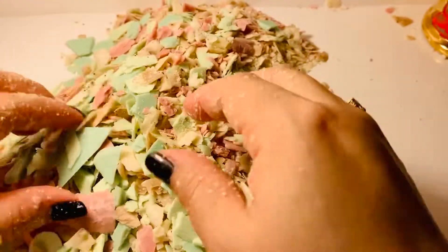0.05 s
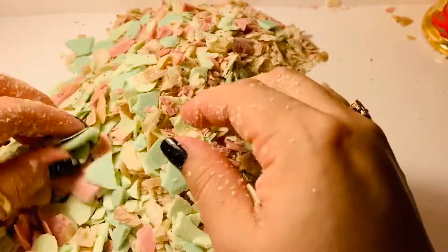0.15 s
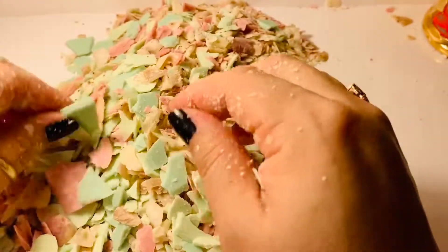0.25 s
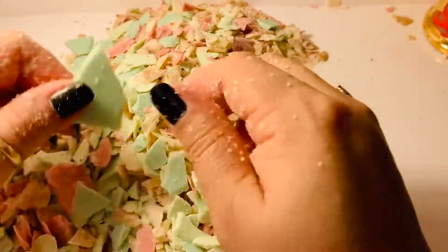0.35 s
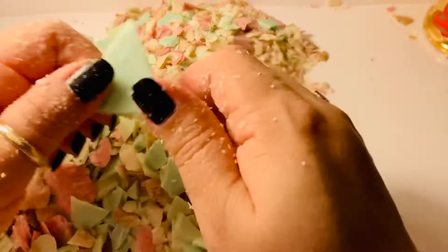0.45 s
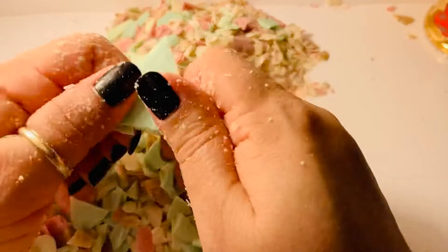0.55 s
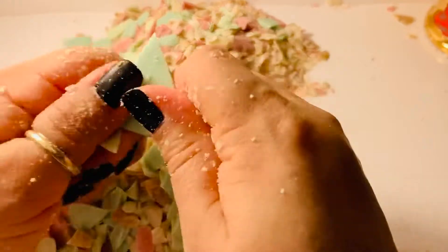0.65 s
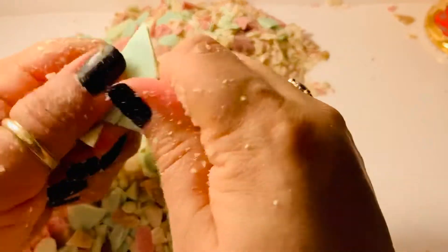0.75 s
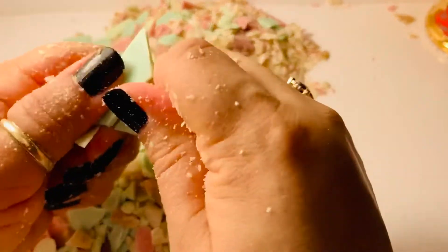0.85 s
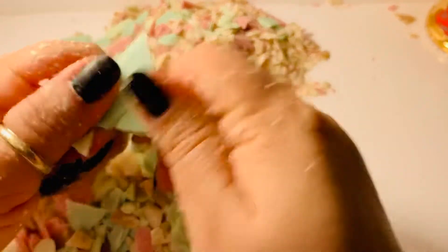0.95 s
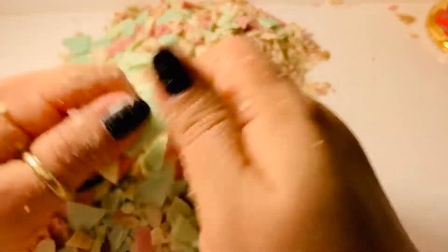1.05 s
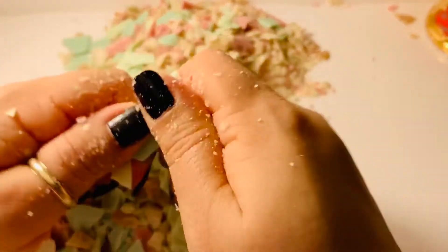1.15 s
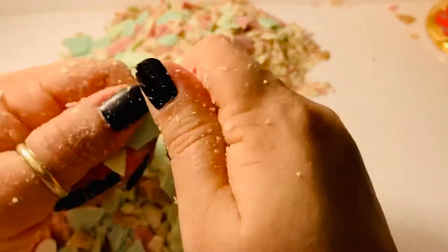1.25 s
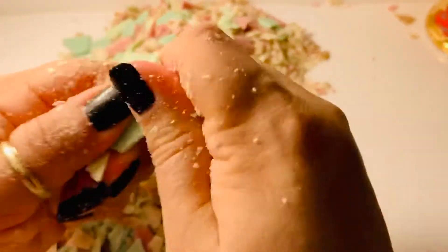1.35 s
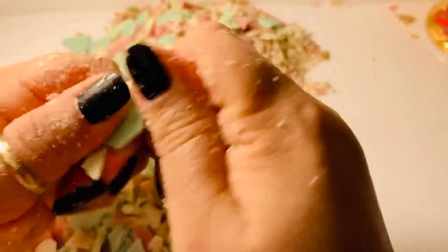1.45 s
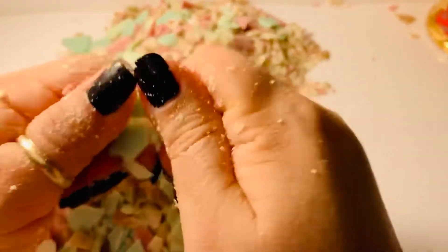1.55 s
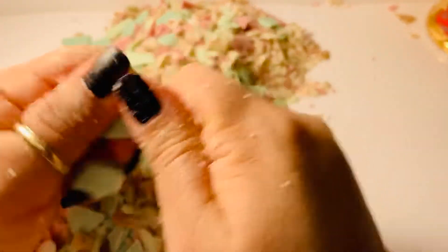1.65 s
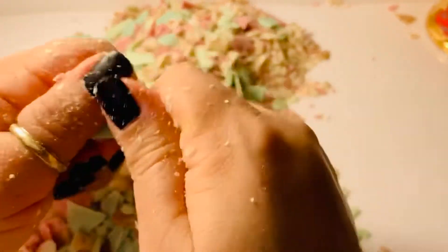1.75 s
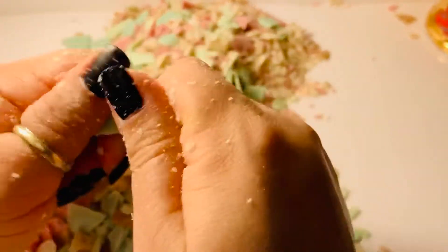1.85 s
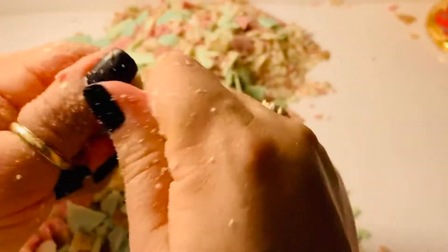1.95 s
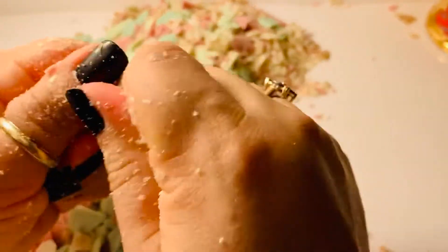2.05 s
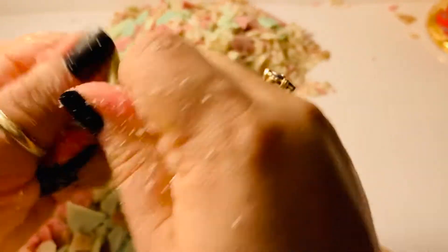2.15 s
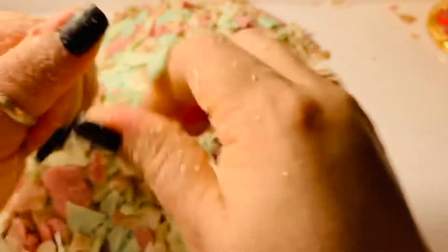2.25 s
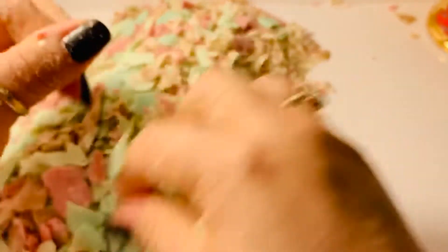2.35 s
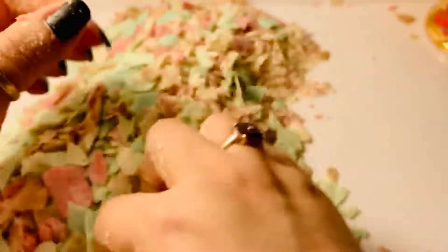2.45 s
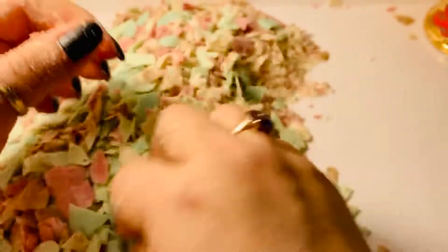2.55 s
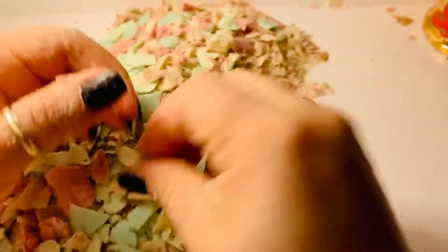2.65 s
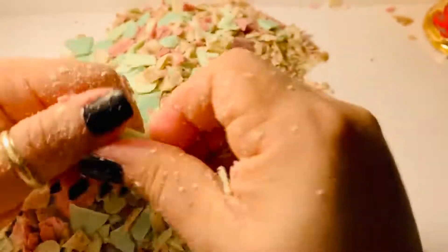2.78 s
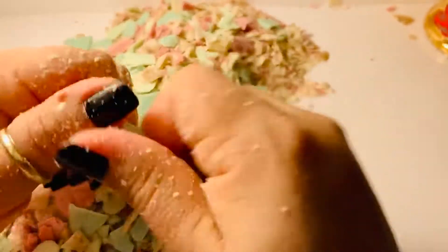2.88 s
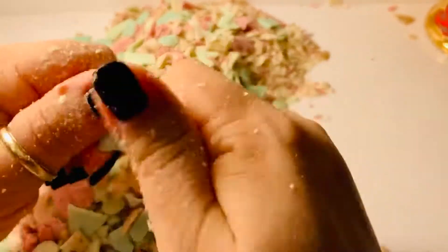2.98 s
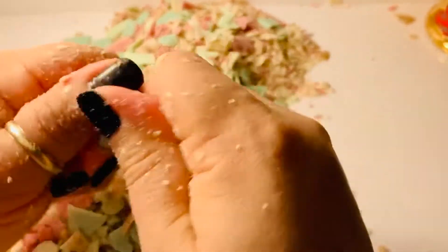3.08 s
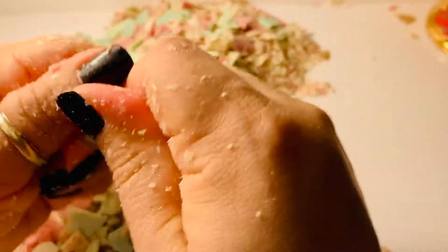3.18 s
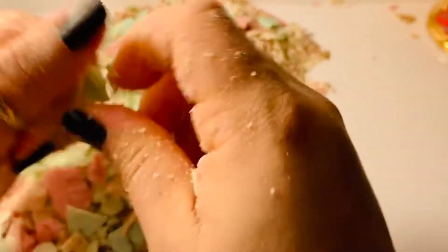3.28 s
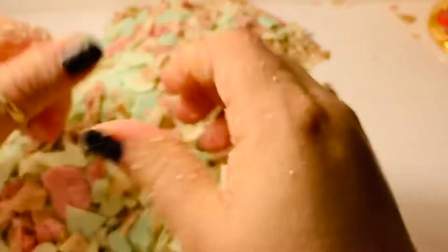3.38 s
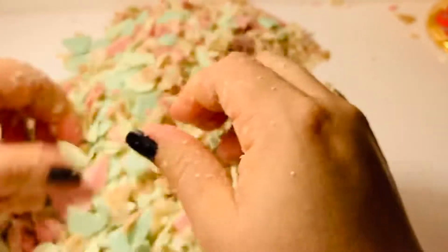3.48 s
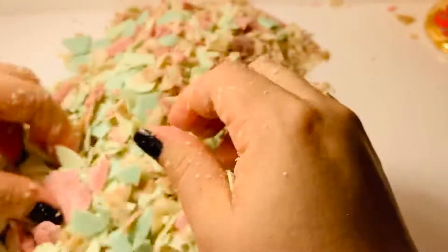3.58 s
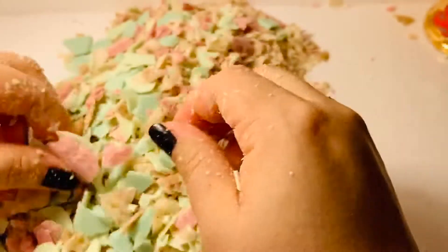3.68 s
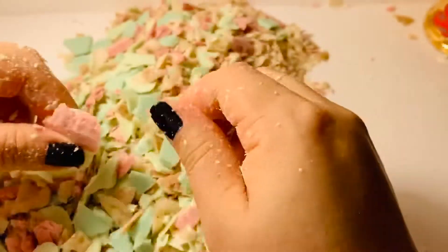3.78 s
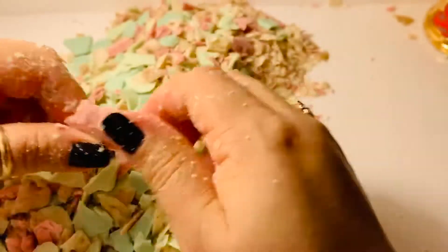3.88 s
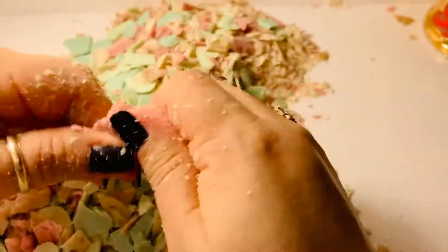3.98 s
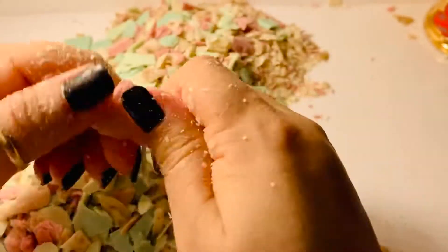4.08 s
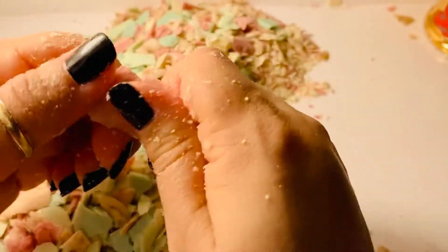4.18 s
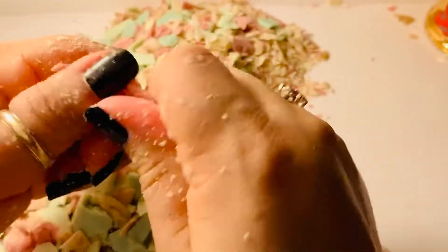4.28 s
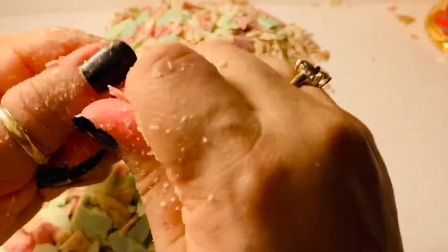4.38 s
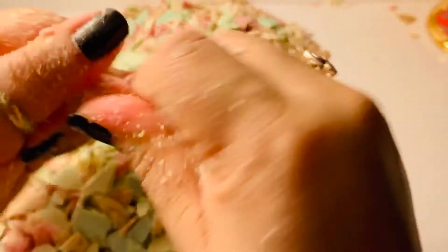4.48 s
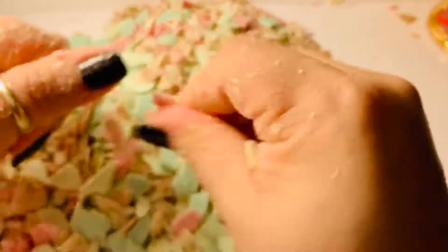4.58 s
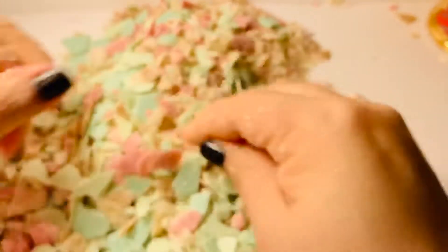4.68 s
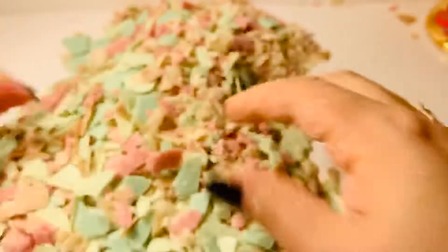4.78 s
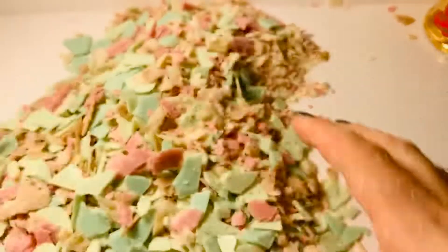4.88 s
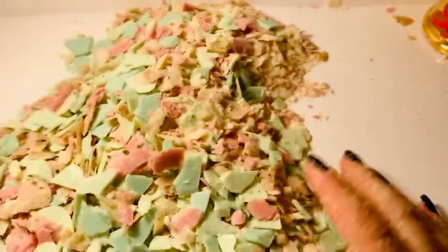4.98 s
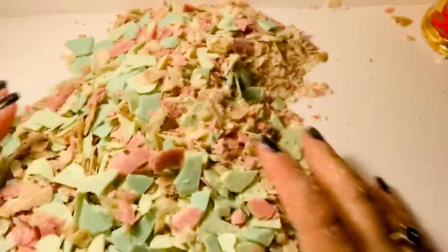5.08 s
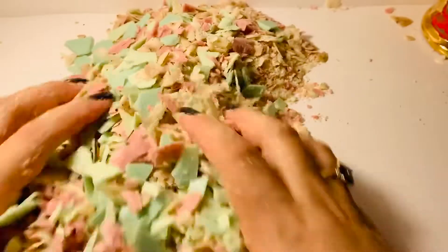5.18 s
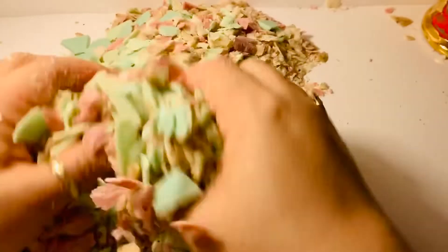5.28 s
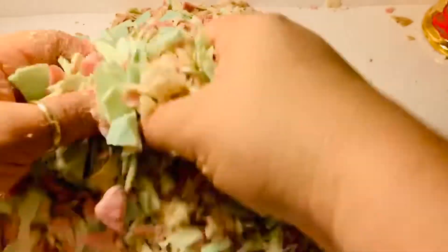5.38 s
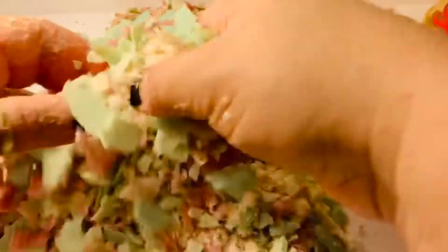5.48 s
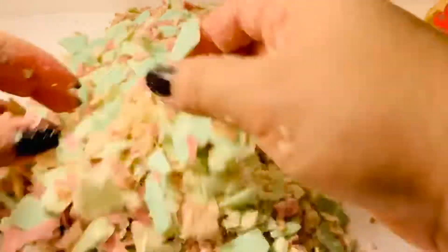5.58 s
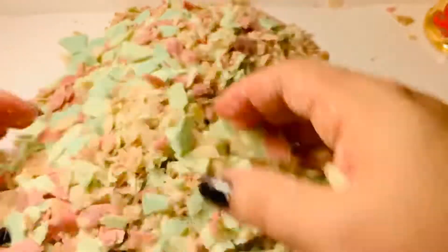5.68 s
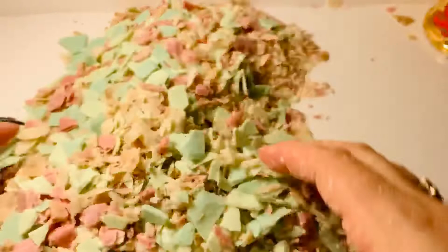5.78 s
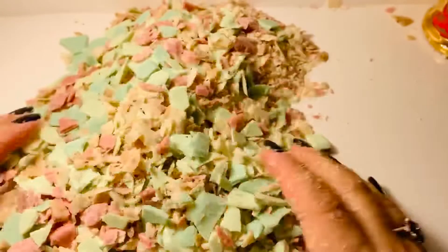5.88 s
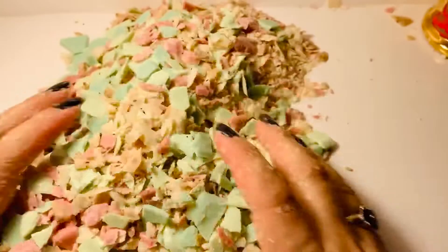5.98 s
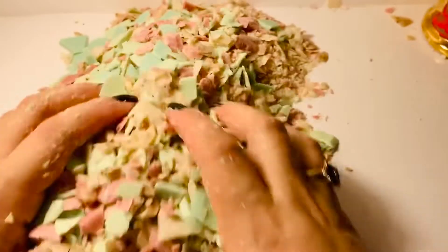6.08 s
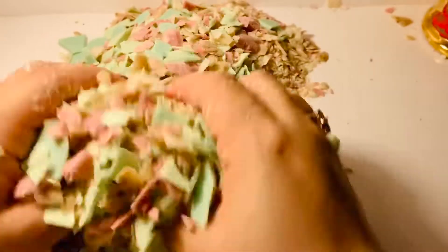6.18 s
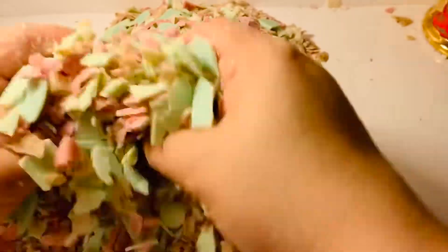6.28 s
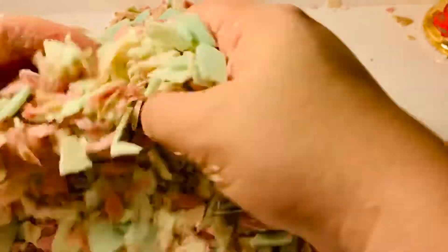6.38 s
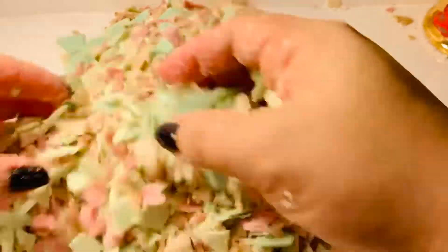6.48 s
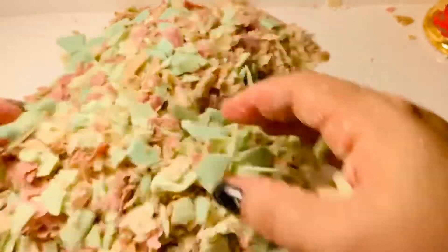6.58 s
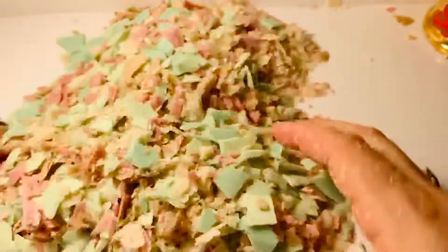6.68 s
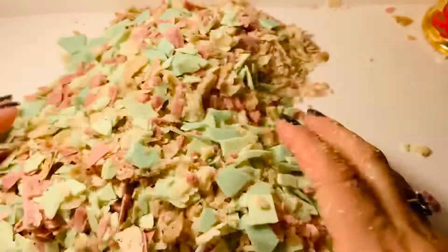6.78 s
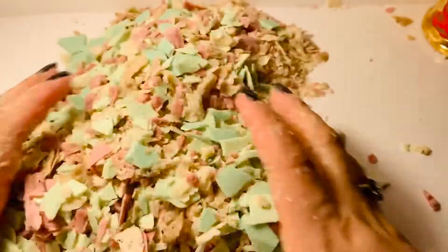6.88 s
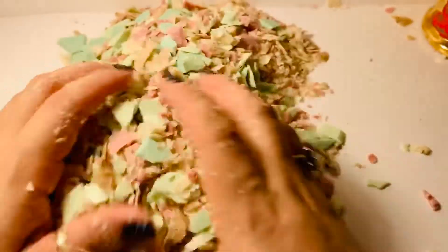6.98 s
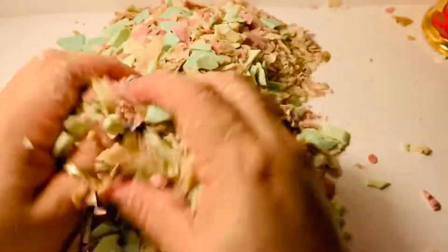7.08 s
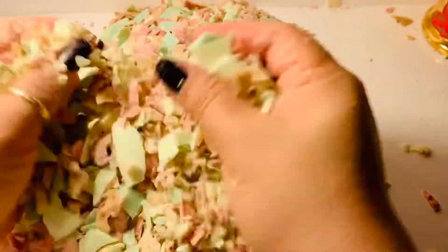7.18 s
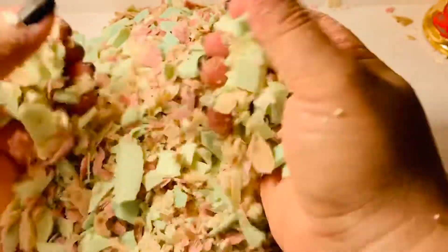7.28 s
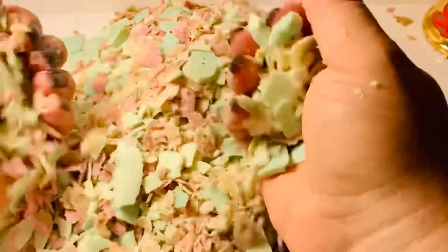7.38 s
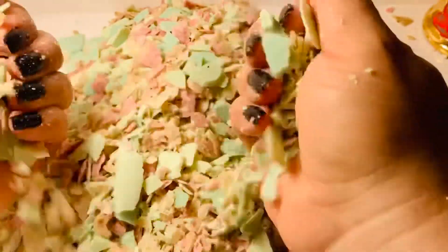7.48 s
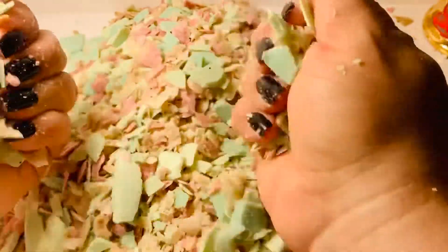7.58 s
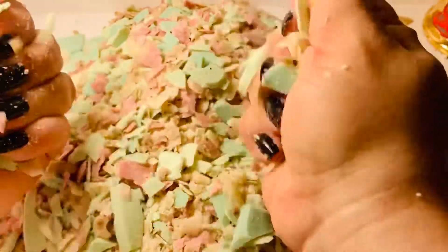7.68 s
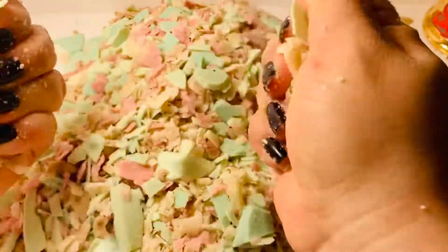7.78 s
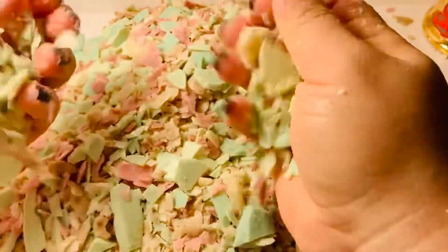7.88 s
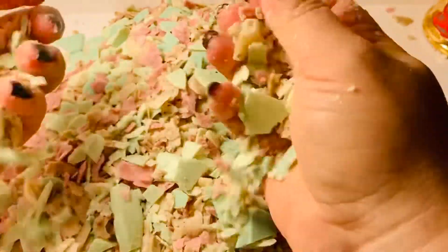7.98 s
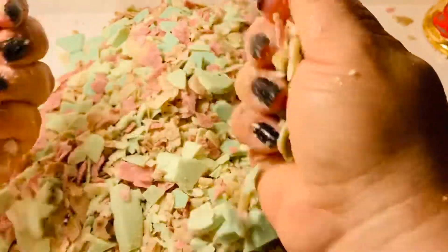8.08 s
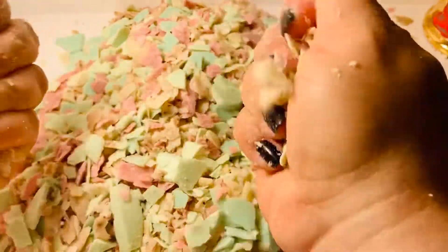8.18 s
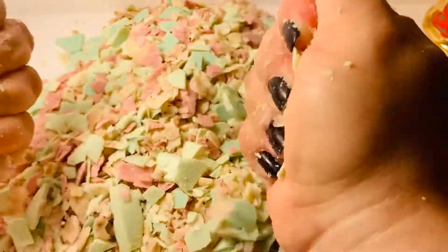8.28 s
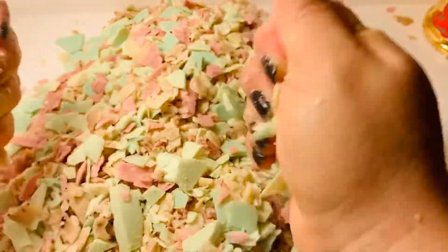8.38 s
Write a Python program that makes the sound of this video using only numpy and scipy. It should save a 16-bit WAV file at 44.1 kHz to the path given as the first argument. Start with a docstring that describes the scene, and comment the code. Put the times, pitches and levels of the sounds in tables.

```python
"""Fingers snap thin flakes of dry soap close by, each break a bright filtered burst with a knock and powder.
Then both hands scoop and crush the pile: many random clicks ring as crumbling and rubbing flakes.
Pieces drop, large flakes slip, and the table thuds and creaks through low resonances and bent ticks.
Something metal clinks once as a set of fading tones. Filtered noise makes a short room echo, a low rumble,
a passing drone and faint hiss; two close microphone ports hear it all in stereo."""
import sys
import numpy as np
from scipy import signal
from scipy.fft import rfft, irfft, next_fast_len
from scipy.io import wavfile
from scipy.ndimage import uniform_filter1d

SR = 44100
rng = np.random.default_rng(int(sys.argv[2]) if len(sys.argv) > 2 else 0)


def bounce(signal):
    """Save signal as a 16-bit WAV file at the path given by the first command-line argument."""
    frames = np.transpose(np.atleast_2d(signal))
    limited = np.clip(frames, -1, 1)
    pcm = np.round(limited * 32767).astype(np.int16)
    wavfile.write(sys.argv[1], SR, pcm)


N = 372204
TIME = np.arange(N) / SR  # seconds

# Colour of a gritty edge crunch or scrape: (frequency [Hz], relative level [dB per Hz])
EDGE_COLOUR = [(700, -25.5), (1500, -5), (2400, -8.5), (3300, -7.5), (4300, -8), (5500, -9.5), (8500, -13)]


def snaps():
    """Each break: a short tear, a bright crack, an edge crunch, a knock of the bent flake, a puff of powder."""
    # A flake breaks, levels over 5 ms: (time [s], crack level [dB], crack pitch [Hz],
    # edge crunch level [dB], flake body level [dB], body pitch [Hz])
    breaks = [(0.6876, -30, 10600, -34, -38, 980), (0.9657, -73, 10500, -61.5, -85, 600),
              (1.2434, -18.5, 11300, -44, -42.5, 540), (1.6977, -59, 8560, -56.5, -70, 600),
              (1.922, -27, 10300, -44.5, -41, 890), (1.9582, -29.5, 11500, -45, -47, 804),
              (2.258, -49, 9200, -50, -81, 900), (2.6571, -46, 11500, -63, -74, 600),
              (3.0169, -29.5, 12200, -53, -46.5, 930), (3.0839, -44.5, 11400, -85, -77, 595),
              (3.3402, -50, 11560, -50, -75, 956), (4.247, -60, 9250, -81, -63.5, 600),
              (4.816, -41, 12200, -57, -66, 600), (5.0907, -34, 9200, -65, -52, 800),
              (5.1041, -35, 9450, -77, -47, 750), (5.211, -32.5, 9600, -38, -60, 620),
              (5.218, -30.5, 9500, -38, -42.5, 840), (5.4964, -36.5, 12900, -61, -59, 620),
              (5.613, -38, 10000, -40.5, -53, 587), (5.718, -38, 8500, -44, -50, 664),
              (5.7368, -25.5, 8200, -33.5, -47.5, 745), (5.817, -40, 9050, -40.5, -50, 840),
              (6.0224, -34, 8940, -68, -68, 600), (6.0458, -28.5, 9600, -50, -41, 1020),
              (6.0764, -30, 9500, -39.5, -49, 1000), (6.1103, -36, 10200, -65, -62, 770),
              (6.128, -34, 8700, -66, -52, 1080), (6.132, -35, 8550, -58, -66, 1050),
              (6.5298, -32, 10600, -40.5, -52, 750), (6.6792, -26.5, 10000, -34, -39.5, 880),
              (6.6844, -16, 11250, -32.5, -61, 1100), (7.1957, -30.5, 7900, -47, -74, 970),
              (7.2122, -39, 7240, -23.5, -45, 990), (7.4935, -37.5, 9500, -62, -69, 870),
              (7.5617, -44, 8300, -42.5, -58, 890), (7.6174, -42, 8600, -60, -52, 1000),
              (7.6472, -37.5, 11200, -51, -52, 930), (7.701, -47, 13600, -65, -77, 790),
              (7.818, -34.5, 10100, -34.5, -36.5, 690), (8.087, -33, 10600, -58, -60, 770),
              (8.1823, -31.5, 9100, -60, -59, 810), (8.2149, -35.5, 10400, -64, -72, 1180)]
    # Fine powder sprays from each break: (frequency [Hz], relative level [dB per Hz])
    powder_colour = [(300, 13.5), (1500, -1.5), (3300, 3), (5500, -16), (11000, -6.5), (16000, -21)]
    out = np.zeros((2, N))
    for s, crack_db, crack_hz, edge_db, body_db, body_hz in breaks:
        release = even(fracture(scatter_db=1, decay=.0013))
        edge = even(fracture(scatter_db=7, decay=.002))
        flex = even(fracture(scatter_db=-4, decay=.003))

        crack = ring(ring(release, crack_hz, 6000), crack_hz, 6000)
        crunch = colour(edge, EDGE_COLOUR)
        body = bend(ring(ring(flex, body_hz, 630), body_hz, 830), lag=0.00224)
        powder = colour(splinters(decay=0.016, spread_db=4.5), powder_colour)

        # The tear grows for 256 samples and ends where the crack begins.
        growth = np.exp(np.arange(-256, 0) / SR / .0015)
        tear = ring(rng.standard_normal((2, 256)) * growth, crack_hz, 2 * crack_hz)
        tearing = sized(tear, crack_db - 18) + sized(colour(tear, EDGE_COLOUR), edge_db - 14)

        add(out, s - tear.shape[1] / SR, tearing)
        add(out, s, sized(crack, crack_db) + sized(crunch, edge_db) + sized(body, body_db))
        add(out, s, sized(powder, (crack_db + edge_db) / 2 - 14.5))
    return out


def effort():
    """The work of the hands as three gains over time: crumbling, rubbing and push on the table."""
    # Loose flakes keep shifting under the hands:
    # (time [s], crumbling level [dB], rubbing level [dB], push level [dB])
    stir = [(0, -85, -88, -66), (0.499, -91, -91, -74.5), (2.901, -89, -94, -73.5), (4.1, -94, -90, -69.5),
            (4.299, -83.5, -89, -69.5), (4.9, -79.5, -80.5, -63.5), (5.02, -54.5, -62, -54.5),
            (6.8, -59, -59, -56.5), (7.4, -61, -64, -62.5), (7.68, -80, -66, -65), (8.44, -96, -71, -80)]
    # Fingers pick at, brush or pinch a few flakes:
    # (start [s], length [s], crumbling level [dB], rubbing level [dB], push on the table level [dB])
    touches = [(.02, 0.11, -91, -74, -85), (.07, 0.038, -73, -69, -60.5), (.255, 0.0064, -67, -72.5, -62),
               (1.037, 0.015, -65.5, -60.5, -61), (1.58, 0.0046, -61, -66, -78),
               (1.686, 0.029, -75, -71.5, -52), (2.105, 0.042, -71.5, -79, -72),
               (2.19, 0.019, -67.5, -96, -78), (2.262, 0.024, -69, -66, -51.5),
               (2.368, 0.051, -67.5, -64, -53.5), (2.497, 0.026, -76, -63, -58.5),
               (2.555, 0.057, -80, -74, -53), (3.19, 0.023, -60.5, -70, -62), (3.27, 0.035, -62, -69, -56),
               (3.337, 0.008, -52, -86, -54), (3.394, 0.033, -65, -60, -51.5),
               (3.52, 0.14, -77, -70, -63.5), (3.885, 0.018, -72, -65.5, -57.5),
               (4.132, 0.016, -66, -63.5, -58), (4.535, 0.026, -69.5, -68, -54.5),
               (4.58, 0.094, -90, -99, -56.5), (4.7, 0.068, -65, -63.5, -77),
               (4.795, 0.019, -56.5, -63, -53.5), (4.882, 0.0037, -58, -66, -56),
               (4.924, 0.013, -50, -55, -58), (4.995, 0.15, -49.5, -57, -82),
               (6.365, 0.39, -49, -59.5, -59.5), (6.865, 0.21, -57, -58, -51),
               (7.467, 0.012, -68, -71, -52.5), (7.612, 0.013, -45.5, -48, -71),
               (7.702, 0.047, -54.5, -61, -76), (8.112, 0.0082, -44, -62, -52),
               (8.148, 0.0073, -42.5, -42, -73), (8.298, 0.012, -52.5, -64, -78)]
    # Both hands dig into the pile, then lift:
    # (start [s], length [s], crumbling level [dB], rubbing level [dB], push level [dB])
    digs = [(5.08, 0.16, -46.5, -51, -46.5), (5.97, 0.12, -45.5, -49.5, -46),
            (6.958, 0.086, -55, -56.5, -47)]
    # A fist squeezes and crumbs spill back:
    # (start [s], length [s], crumbling level [dB], rubbing level [dB], push level [dB])
    spills = [(5.46, 0.28, -50, -57, -52), (6.515, 0.13, -42, -48, -51), (7.46, 0.14, -53.5, -64.5, -79),
              (7.86, 0.27, -55.5, -64.5, -59), (8.08, 0.18, -60.5, -65, -77),
              (8.38, 0.069, -54.5, -64, -57)]
    # Rise and fall are shares of the move's length; tilt is its growth from start to end.
    touch_shape = dict(rise=0.11, fall=0.2, tilt_db=-6.5)
    dig_shape = dict(rise=.33, fall=.3, tilt_db=-3)
    spill_shape = dict(rise=0.17, fall=0.013, tilt_db=-3.5)

    when, *levels = np.transpose(stir)
    power = np.array([amp(np.interp(TIME, when, db)) ** 2 for db in levels])
    for moves, shape in [(touches, touch_shape), (digs, dig_shape), (spills, spill_shape)]:
        for start, length, *db in moves:
            power += np.outer(amp(db) ** 2, stroke(start, length, **shape) ** 2)
    return np.sqrt(power)


def crumbling(force, count=40):
    """Crumbs of many sizes crack in the pile, each with its own pitch; a light touch sounds duller."""
    # Colour of the crumbling: (frequency [Hz], relative level [dB per Hz])
    crumble_colour = [(1200, -35.5), (3000, -8.5), (5000, -10), (6500, -3.5), (9300, -1), (12000, -2),
                      (14500, -2.5), (15700, -7), (16200, -44.5)]
    out = np.zeros((2, N))
    log_force = np.log(force / force.max())
    for hz in np.geomspace(2800, 14500, count):
        grain = ring(fracture(scatter_db=-2, decay=.0013, size=512), hz, hz * .25)
        clicks = contacts(per_s=105, spread_db=4.6, largest=4.9)
        hit = np.flatnonzero(clicks)
        # Less force weakens crumbs above 8500 Hz and favours those below.
        clicks[hit] *= np.exp(0.0855 * np.log(hz / 8500) * log_force[hit])
        out += signal.oaconvolve(clicks[None], grain, axes=1)[:, :N]
    return unit(colour(out, crumble_colour)) * force


def rubbing(force, count=16):
    """Larger flakes slip in bouts, each size in its own; now and then one clicks free across all pitches."""
    # Colour of the rubbing: (frequency [Hz], relative level [dB per Hz])
    rub_colour = [(250, -11.5), (510, -6), (630, -12.5), (760, -2), (1100, -7), (1450, -3.5), (2100, -3.5),
                  (4500, -8.5), (7500, -16.5)]
    out = np.zeros((2, N))
    for hz in np.geomspace(550, 4800, count):
        grain = ring(fracture(scatter_db=3, decay=.002, size=512), hz, hz * .35)
        clicks = contacts(per_s=65, spread_db=3.6, largest=4.0) * clumps(depth_db=3.8, per_s=40)
        out += signal.oaconvolve(clicks[None], grain / np.linalg.norm(grain), axes=1)[:, :N]

    clicks = contacts(per_s=24, spread_db=3, largest=2)
    catches = signal.oaconvolve(clicks[None], fracture(scatter_db=0, decay=.001), axes=1)[:, :N]
    catches = ring(catches, hz=1480, width=4000)
    return unit(top(colour(unit(out) + .75 * unit(catches), rub_colour))) * force


def knocks():
    """Pieces land on the table, large flakes slip, and the table creaks in single dull ticks."""
    # Pieces land on the pile and the table:
    # (time [s], level over 5 ms [dB], brightness [dB per octave])
    landings = [(0.292, -53.5, -7.5), (2.464, -56.5, 2), (2.499, -71, 8), (5.003, -53, 0),
                (5.126, -44.5, -6), (5.314, -49.5, 8), (5.446, -44.5, 4), (5.55, -49, -1), (5.607, -58, 13),
                (5.662, -45, -3), (5.686, -58, -3), (6.396, -44, 17), (6.442, -40, 2.5), (6.495, -37, -5),
                (6.52, -36, -3), (6.633, -45, -1), (6.729, -47.5, 0.5), (6.75, -42.5, 2),
                (7.2119, -27.5, -1), (7.309, -47, -1.5), (7.361, -47, 1), (7.396, -45.5, 15),
                (7.458, -54, -4), (7.508, -43, 8.5), (7.554, -44, -2.5), (7.588, -42.5, 1.5),
                (7.6471, -40.5, 1.5), (7.8202, -34.5, -2.5), (7.881, -50.5, 3), (7.972, -47.5, 6.5),
                (8.108, -47, 1)]
    # Colour of a landing before its brightness is added: (frequency [Hz], relative level [dB per Hz])
    landing_colour = [(100, 3.5), (270, 9), (400, 8.5), (540, -2.5), (760, 14), (1100, -2.5), (1450, 9),
                      (6000, -11), (16000, -58)]
    # A large flake catches on another and slips:
    # (time [s], level over 5 ms [dB], pitch [Hz], decay [s])
    slips = [(0.068, -71, 1560, 0.015), (.119, -66.5, 1580, 0.013), (2.265, -60.5, 1450, 0.0022),
             (2.387, -59, 2110, 0.0049), (2.815, -65, 1060, 0.017), (3.195, -59.5, 990, 0.011),
             (3.284, -58, 2260, 0.016), (3.407, -66, 1700, 0.011), (5.221, -45, 1700, 0.0028),
             (5.367, -46, 2180, 0.0037), (5.967, -49, 1620, 0.008), (8.135, -47, 1880, 0.0048),
             (8.15, -49.5, 1610, 0.01)]
    # Small dull creaks under the leaning arms: (time [s], level over 5 ms [dB])
    creaks = [(0.7265, -63), (0.809, -62.5), (1.354, -65), (2.0538, -59.5), (2.159, -57), (2.3537, -58.5),
              (2.444, -55.5), (2.5443, -55.5), (2.5633, -55.5), (2.6532, -56.5), (3.156, -66.5),
              (3.8906, -65), (4.498, -61.5), (4.6055, -60)]
    # Colour of a creak: (frequency [Hz], relative level [dB per Hz])
    creak_colour = [(150, 1), (350, 6), (600, 12), (950, -4), (1400, 13), (1900, -19.5), (3000, -8),
                    (8000, -72)]
    out = np.zeros((2, N))
    for s, db, tilt_db in landings:
        blow = even(fracture(scatter_db=3, decay=.0035))
        spectrum = [(hz, level + tilt_db * np.log2(hz / 1000)) for hz, level in landing_colour]
        add(out, s, sized(top(bend(colour(blow, spectrum), lag=0.00225)), db))
    for s, db, hz, decay in slips:
        scrape = splinters(decay, spread_db=4) * [[1], [.6]]  # weaker from aside
        add(out, s, sized(ring(ring(scrape, hz, hz * 0.089), hz, hz * 2.2), db))
    for s, db in creaks:
        slip = fracture(scatter_db=-10, decay=.002)
        add(out, s - .0022, sized(bend(colour(slip, creak_colour), lag=0.00313), db))
    return out


def table(force):
    """The shifting pile drums on the table top; now and then a hand bumps it."""
    # Ways the table vibrates: (frequency [Hz], width of the first filter [Hz], relative level [dB])
    table_modes = [(152, 35.3, 3.5), (224.8, 62, 3), (267, 58, -4.5), (328, 120, -17)]
    # A hand bumps or presses the table: (time [s], level over 5 ms [dB], pitch [Hz])
    bumps = [(0.583, -45.5, 53), (0.634, -47, 54.7), (1.255, -39, 68.7), (2.568, -46.5, 68.5),
             (4.942, -40.5, 68), (0.082, -46.5, 230), (2.266, -54, 261), (2.373, -54, 224),
             (3.268, -59, 273), (3.401, -47.5, 266), (4.614, -49.5, 223), (5.205, -39.5, 232),
             (1.922, -51.5, 445), (6.088, -41, 239), (6.477, -36, 219), (6.962, -34.5, 238),
             (7.211, -43, 314)]
    push = np.array([contacts(per_s=770, spread_db=3.5, largest=5.37) for _ in range(2)])
    drumming = sum(ring(ring(push, hz, width), hz, 2 * width) * amp(db) for hz, width, db in table_modes)
    out = unit(drumming) * force
    t = np.arange(SR // 4) / SR
    for s, db, hz in bumps:
        thump = t * np.exp(-t / 0.0076) * np.sin(2 * np.pi * hz * t)
        add(out, s, sized(np.outer([1, 0], thump), db))  # straight on only
    return out


def clink():
    """Metal is struck with a gritty scrape, chatters as it rings, is damped at a touch, and rings on thinly."""
    # The metal rings until it touches down again:
    # (time [s], length [s], level over 5 ms [dB], brightness [dB per octave, for one octave at most])
    strikes = [(7.7725, .0205, -26.5, -2), (7.793, .022, -38.5, 24)]
    # Tones of the metal: (frequency [Hz], relative level [dB], time to fade by 60 dB if undamped [s])
    metal_modes = [(2115, 1, .25), (2186, -16, .08), (4383, -15, .04), (4490, -7, .3), (5290, 2, .03),
                   (5818, -1, .04), (7063, -12, .03), (13380, -21, .06)]
    out, t = np.zeros((2, N)), np.arange(SR // 3) / SR
    for s, length, level_db, tilt_db in strikes:
        flutter = uniform_filter1d(rng.standard_normal((len(metal_modes), len(t))), 60)
        chatter = 1 + .16 * unit(flutter)
        tones = 0
        for (hz, db, t60), shake in zip(metal_modes, chatter):
            octaves = min(np.log2(hz / metal_modes[0][0]), 1)
            wave = np.exp(-np.log(1000) * t / t60 + 2j * np.pi * (hz * t + rng.random()))
            tones = tones + amp(db + tilt_db * octaves) * shake * wave
        # The next touch damps the tones to a thin remainder within 3 ms.
        tones = tones * np.interp(t, [0, .001, length, length + .003], [0, 1, 1, .08])
        scrape = colour(fracture(scatter_db=6, decay=0.013), EDGE_COLOUR)
        add(out, s, sized(np.array([tones.real, -.3 * tones.imag]), level_db))
        add(out, s, sized(scrape, level_db - 14))
    return out


def room(x, count=3):
    """Short echo tails die at a rate set by pitch; they take turns steadily, as if the hands moved."""
    # How long the room rings: (frequency [Hz], time to fade by 60 dB [s])
    fade_times = [(150, 0.28), (1000, 0.16), (14000, 0.17)]
    t, out = np.arange(SR // 3) / SR, np.zeros((2, N))
    for k in range(count):
        taps = rng.standard_normal((2, len(t))) * np.clip((t - .002) / .004, 0, 1)  # starts after 2 ms
        hz, when, z = signal.stft(taps, SR, nperseg=256)
        fade = amp(-60 * when / read(fade_times, hz)[:, None])
        tail = signal.istft(z * fade, SR, nperseg=256)[1]
        share = np.sqrt(2 / count) * np.cos(np.pi * (2 * np.pi * TIME + k / count))
        out += signal.oaconvolve(x[:1] * share, tail / np.linalg.norm(tail[0]), axes=1)[:, :N]
    return out


def background():
    """Low rumble of the house, swelling unevenly, a low drone that comes and goes, and a faint even hiss."""
    # Colour of the rumble: (frequency [Hz], relative level [dB per Hz])
    rumble_colour = [(20, -34), (48, -4.5), (88, -4), (125, -13), (400, -30), (1000, -37), (4000, -68)]
    # The rumble swells and sinks, before a 1 dB cut and random wavering: (time [s], level [dB])
    swell_levels = [(0, -64.5), (2.2, -60), (3.8, -58), (5.2, -55.5), (8.4, -63)]
    # Colour of the hiss: (frequency [Hz], gain [dB], before the overall hiss gain)
    hiss_colour = [(500, 3.5), (2000, 4.5), (5000, 1.5), (9500, -1.5), (14000, 3)]
    drone_hz, drone_db = 89.6, -63.5
    rumble, drone, hiss = rng.standard_normal((3, 2, N))
    swell = amp(np.interp(TIME, *np.transpose(swell_levels)) - 1) * clumps(depth_db=2, per_s=11)
    drone = unit(ring(ring(drone, drone_hz, 14), drone_hz, 14))
    drone = amp(drone_db) * drone * stroke(start=3.26, length=1.41, rise=0.11, fall=0.11, tilt_db=0)
    return swell * unit(colour(rumble, rumble_colour)) + drone + amp(-83.5) * colour(hiss, hiss_colour)


def ports(x):
    """Two close microphone ports share some sound and the rest differs in sign; the right port lags the left by
    a phase set at each pitch."""
    # How alike the two ports hear: (frequency [Hz], likeness [0-1])
    likeness = [(130, 0.89), (330, 0.77), (700, 0.047), (3000, 0.033), (5000, 0.17), (7000, 0.42),
                (9500, 0.99), (13500, 0.74), (16000, 0.68)]
    # How far the left port leads the right: (frequency [Hz], lead [radians])
    left_lead = [(1000, 0), (1900, -.6), (3000, -2.6), (4500, -.5), (6800, .7), (9600, 3.1), (11000, 4.2),
                 (12600, 5.8), (14000, 6.6), (16000, 8.9)]
    size = next_fast_len(N + 4096)
    hz, z = np.fft.rfftfreq(size, 1 / SR), rfft(x, size)
    same = np.clip(read(likeness, hz), -1, 1)
    common = z[0] * np.sqrt((1 + same) / 2)
    apart = z[1] * np.sqrt((1 - same) / 2)
    left, right = common + apart, (common - apart) * np.exp(-1j * read(left_lead, hz))
    return irfft(np.array([left, right]), size)[:, :N]


def fracture(scatter_db, decay, size=2048):
    """A sharp release, then a spray of tiny after-cracks and near echoes. Rows: straight on, from aside."""
    spray = rng.standard_normal((2, size)) * np.exp(-np.arange(size) / SR / decay)
    spray *= amp(scatter_db) / np.linalg.norm(spray[0])
    spray[0, 0] += 1
    return spray


def splinters(decay, spread_db, size=4096, count=70):
    """A dying spray of tiny cracks that come in uneven bunches."""
    bunches = np.interp(np.arange(size) * count / size, np.arange(count), rng.standard_normal(count))
    bunch_gain = amp(spread_db * np.clip(bunches, -2, 2))
    return rng.laplace(size=(2, size)) * bunch_gain * np.exp(-np.arange(size) / SR / decay)


def contacts(per_s, spread_db, largest):
    """Random clicks of either sign, many small and few large; the more flakes share the force, the smaller."""
    # Whole handfuls rustle densely, a few flakes tick apart: (time [s], contact rate [times normal])
    crowding = [(4.9, 1.1), (5.05, 2.2), (7.1, 2.4), (7.35, 0.4)]
    crowd = np.maximum(np.interp(TIME, *np.transpose(crowding)), .1)
    size = amp(spread_db * np.minimum(rng.exponential(1, N), largest)) / np.sqrt(crowd)
    return size * rng.choice([-1, 1], N) * (rng.random(N) < crowd * per_s / SR)


def clumps(depth_db, per_s):
    """Flakes give way in bunches: a random gain that heads for a new value per_s times a second."""
    steps = rng.standard_normal(2048)
    return amp(depth_db * np.interp(TIME * per_s + rng.random(), np.arange(len(steps)), steps))


def stroke(start, length, rise, fall, tilt_db):
    """One move of the hand as a gain: it swells, holds while growing or easing by tilt_db, and dies away."""
    progress = (TIME - start) / length
    outside = np.maximum(-progress / rise, 0) + np.maximum((progress - 1) / fall, 0)
    return amp(tilt_db * np.clip(progress, 0, 1)) * np.exp(-np.minimum(outside, 20))


def top(x):
    """The table top also rings higher up under sharp contacts: adds its resonances to the sound."""
    # Higher table resonances: (frequency [Hz], width [Hz], level [dB])
    top_modes = [(700, 70, -1.5), (1537, 27, -5)]
    return x + sum(amp(db) * ring(x, hz, width) for hz, width, db in top_modes)


def bend(x, lag):
    """Bending waves in a board: low pitches travel slowest, so a tick arrives as a short falling chirp."""
    hz = np.fft.rfftfreq(x.shape[1], 1 / SR)
    delay = lag * np.maximum(np.sqrt(1000 / (hz + 150)) - .6, 0)  # seconds
    return irfft(rfft(x) * np.exp(-2j * np.pi * np.cumsum(delay) * hz[1]), x.shape[1])


def ring(x, hz, width):
    """One resonance of gain 1 at its centre; narrow widths ring longer."""
    hz = min(hz, SR / 2 - 2000)
    return signal.lfilter(*signal.iirpeak(hz, max(hz / width, .6), SR), x)


def colour(x, spectrum, size=4096):
    """Shapes the pitch balance with a filter that never sounds ahead of its input."""
    log_gain = np.log(amp(read(spectrum, abs(np.fft.fftfreq(size, 1 / SR)))))
    # The Hilbert transform gives the phase that packs the response towards its start.
    taps = np.fft.ifft(np.exp(np.conj(signal.hilbert(log_gain)))).real[:size // 2]
    return signal.fftconvolve(x, taps[None], axes=1)[:, :x.shape[1]]


def even(x):
    """Levels the chance peaks and dips in the spectrum of a short spray, keeping the energy of each row."""
    hz = np.fft.rfftfreq(x.shape[1], 1 / SR)
    correction_db = -10 * np.log10(uniform_filter1d(abs(rfft(x)) ** 2, size=7))
    rows = [colour(row[None], np.column_stack([hz, db])) for row, db in zip(x, correction_db)]
    flat = np.vstack(rows)
    return flat * (np.linalg.norm(x, axis=1) / np.linalg.norm(flat, axis=1))[:, None]


def amp(db):
    """Turns decibels into a gain."""
    return 10 ** (np.asarray(db) / 20)


def unit(x):
    """Scales to rms 1."""
    return x / np.sqrt(np.mean(x ** 2) + 1e-20)


def sized(x, db):
    """Gives a short sound the energy of 5 ms at this level."""
    return amp(db) * x * np.sqrt(.005 * SR / (np.sum(x ** 2) + 1e-20))


def read(points, hz):
    """Reads a table on a log-frequency axis."""
    f, value = np.transpose(points)
    return np.interp(np.log(hz + 1), np.log(f + 1), value)


def add(mix, s, sound):
    """Mixes a two-row sound in at time s."""
    part = mix[:, max(round(s * SR), 0):]
    part[:, :sound.shape[1]] += sound[:, :part.shape[1]]


def scene():
    """Mixes the close sounds with their room echo and the background, as the two ports hear them."""
    # Cracks beam their treble, so the room answers darker: (frequency [Hz], echo gain [dB])
    echo_colour = [(500, -12.5), (4500, -11), (12000, -25.5)]
    crush, rub, push = effort()
    pile = (crumbling(crush) + rubbing(rub)) * clumps(depth_db=2.4, per_s=70)
    cracks = snaps()
    hard = knocks() + clink()
    far = room(colour(cracks, echo_colour) + amp(-8.5) * pile + amp(-11) * hard)
    return ports(cracks + pile + hard + table(push) + far + background())


def record(dry):
    """The recorder rounds off the very highest peaks, then limits the band."""
    cutoff_hz = 16600
    held = dry / (1 + (dry / .85) ** 6) ** (1 / 6)
    lowpass = signal.firwin(255, cutoff_hz, window=("kaiser", 9), fs=SR)
    return signal.oaconvolve(held, lowpass[None], "same", axes=1)


dry = scene()
out = record(dry)
bounce(out)
```